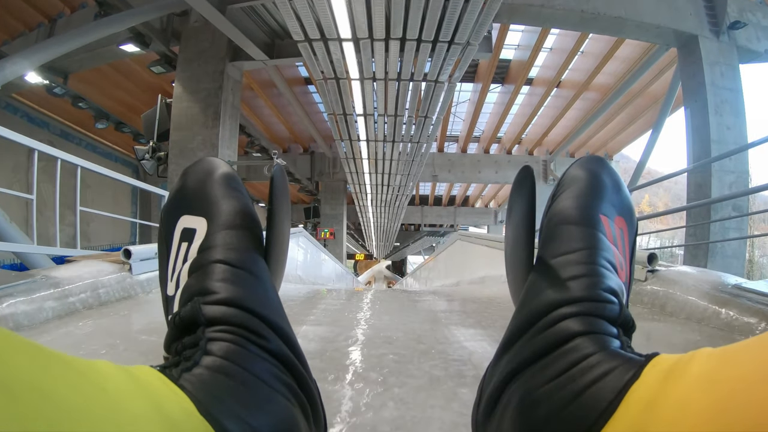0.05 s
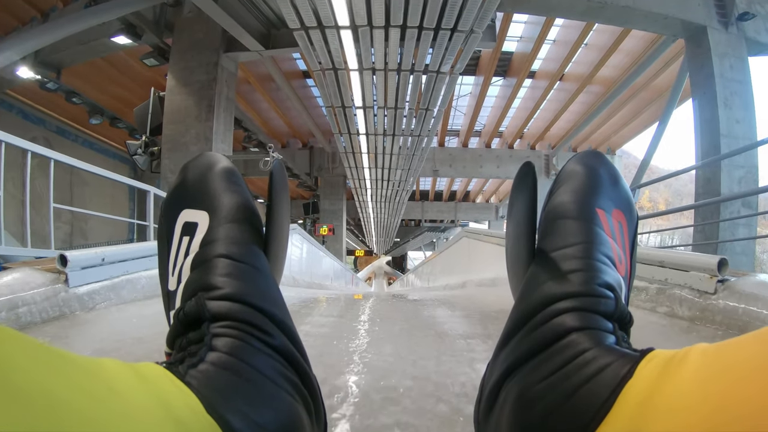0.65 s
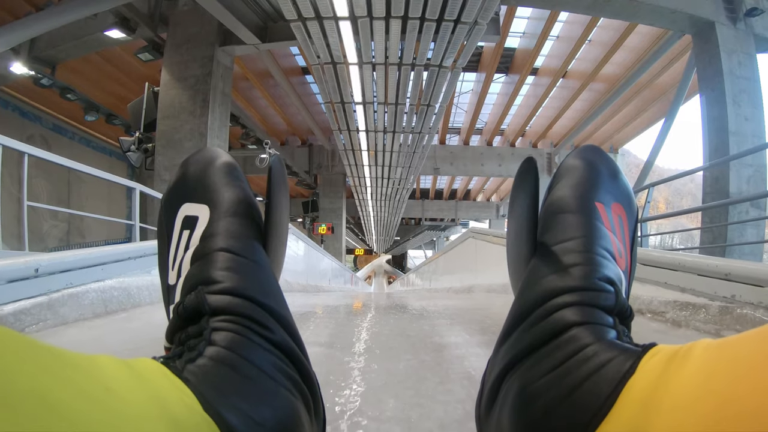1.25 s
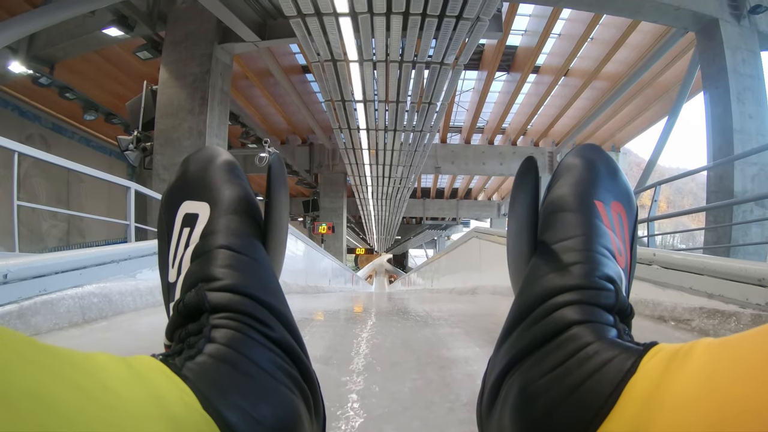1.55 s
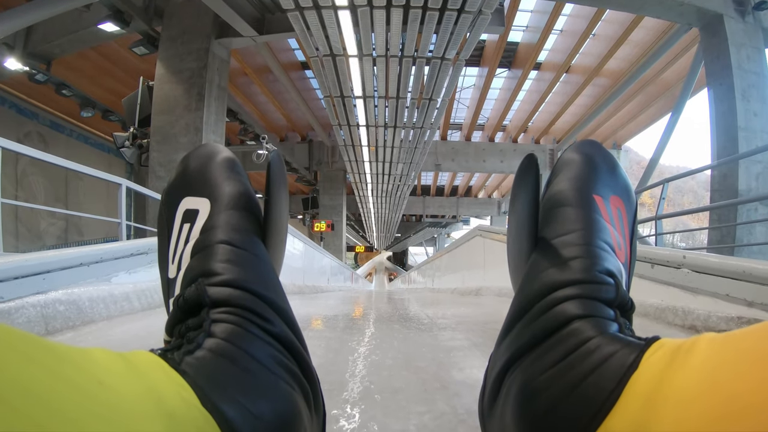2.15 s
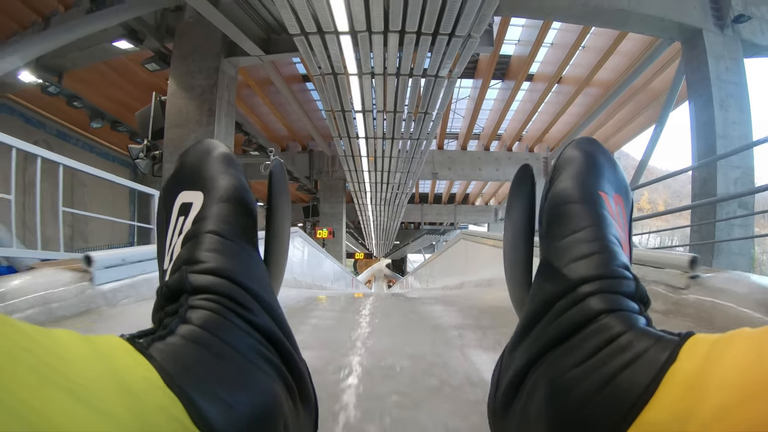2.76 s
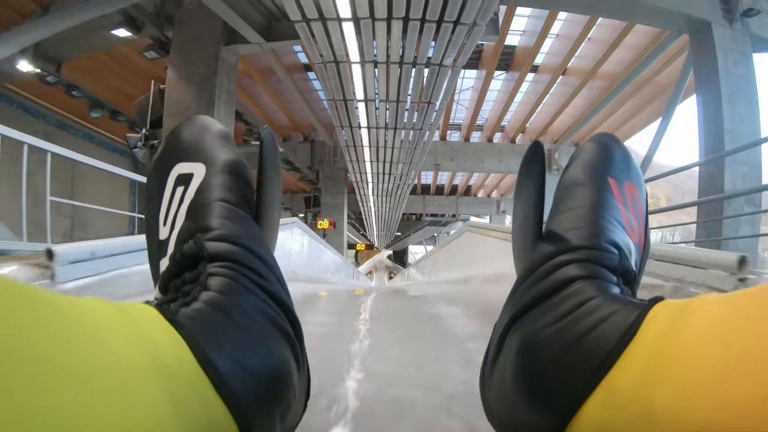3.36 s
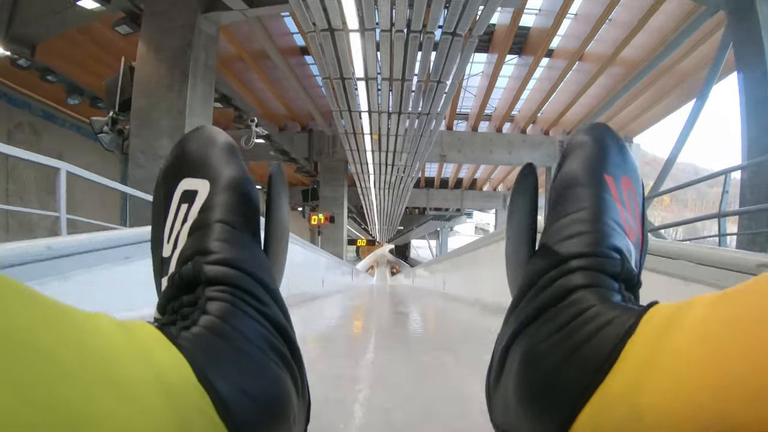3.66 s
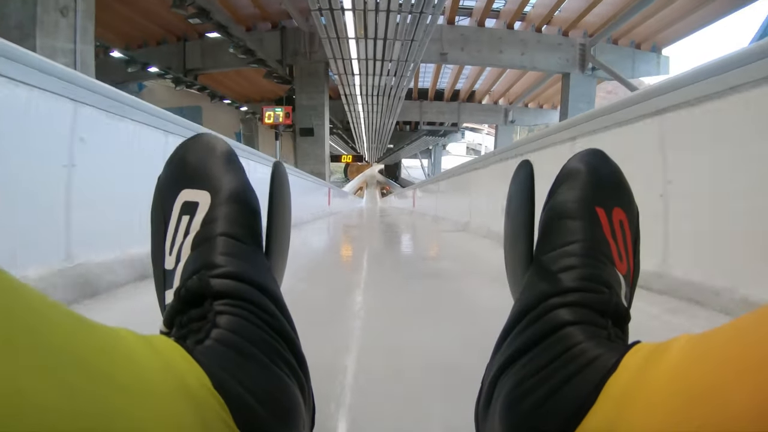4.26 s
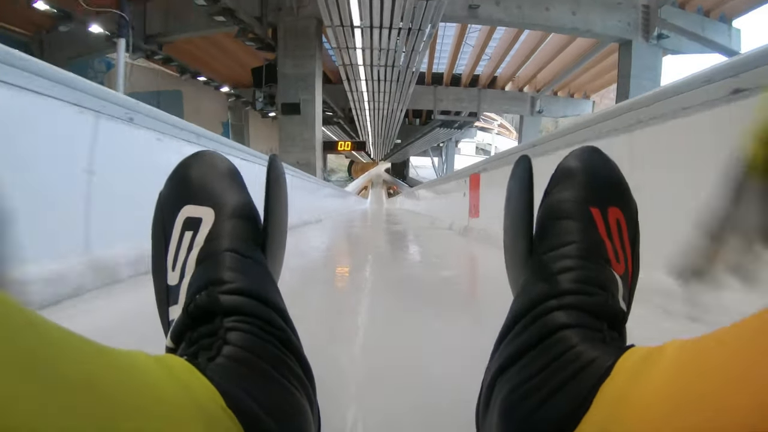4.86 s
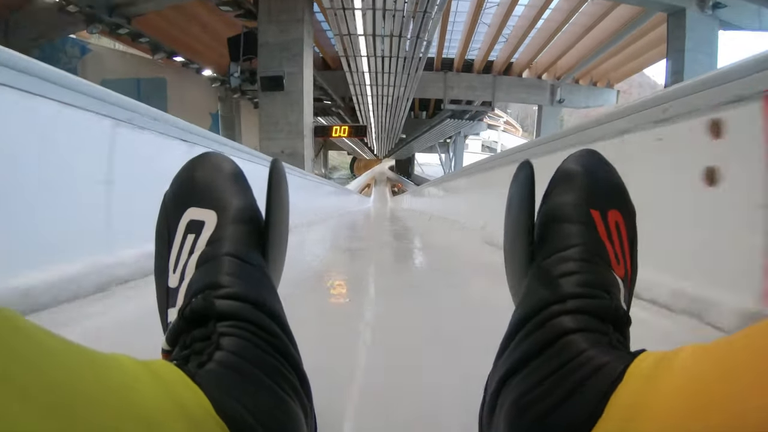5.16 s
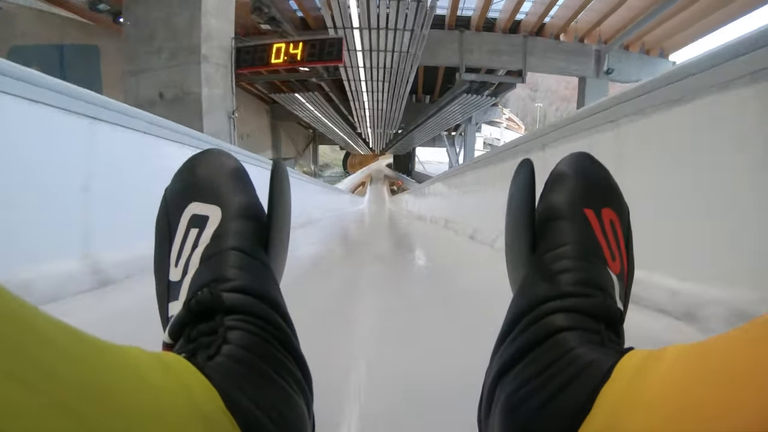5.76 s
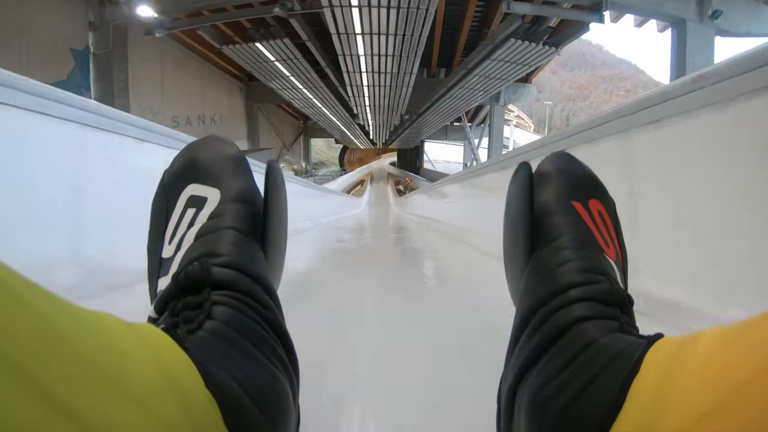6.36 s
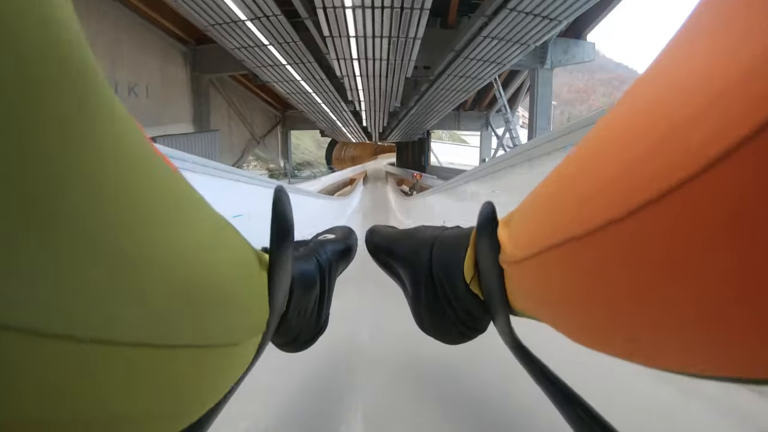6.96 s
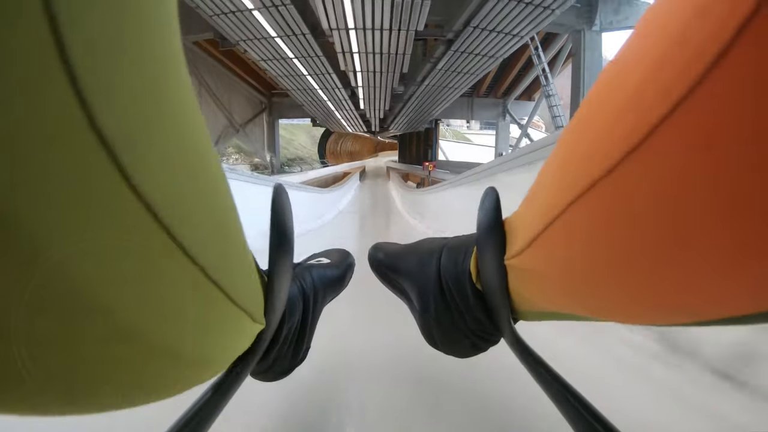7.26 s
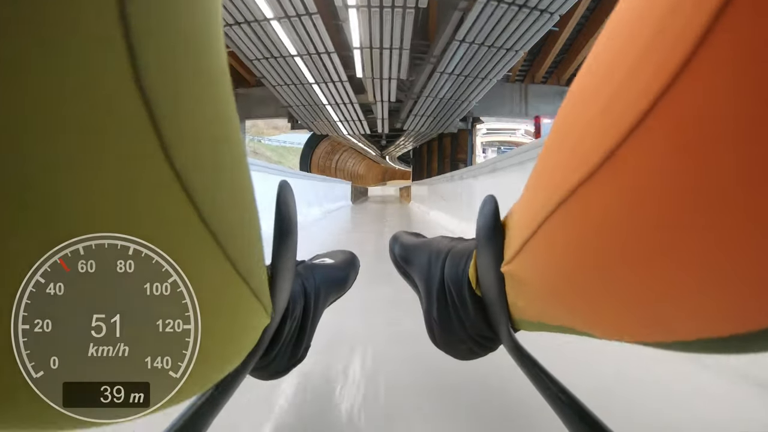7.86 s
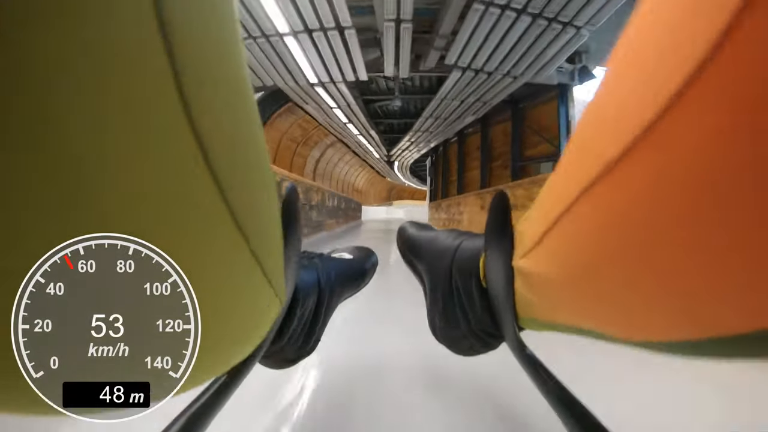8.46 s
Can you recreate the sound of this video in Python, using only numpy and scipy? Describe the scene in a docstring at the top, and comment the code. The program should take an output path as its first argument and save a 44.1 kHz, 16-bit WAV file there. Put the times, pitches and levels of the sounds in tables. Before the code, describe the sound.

A luge is heard from on board on an ice track. At first it rocks to and fro: the steel runners stick and slip with a brief judder, faint uneven scraping and scattered knocks, with two solid woody hits around 2 seconds. At about 2.6 seconds it pulls off with two short chirps and sharper knocks. By 3.6 seconds a loud, steady rumble of sled and air has built up, with steel grinding over rippled ice. Bumps come faster, thumping the seat, ringing the frame and clacking on the ice. From 3 seconds there are faint clinks and tiny puffs of hiss. Between 4 and 5 seconds the edges chirp again, and a runner occasionally sings briefly. Very faint high ticks follow from 6.5 seconds, and the seat booms from about 7.8 until the end at 8.5. Throughout, a very tight doubling makes everything hollow and fluttery.

```python
"""A luge heard from on board. It rocks to and fro: the runners stick and slip, the sled lurches and knocks.
Pulled off at 2.6 s, it gathers speed, steel grinding over rippled ice. Edges catch and chirp; bumps shake
the seat, ring the frame and crack off chips. From 3 s come faint puffs of hiss and clinks on hard spots,
and from 4.3 s a runner sings now and then. Later there are faint, very high ticks, and the seat booms.
Throughout, the sound comes twice, 44 ms apart and equally loud, which makes it hollow and fluttery."""
import sys
import numpy as np
from scipy import signal
from scipy.fft import rfft, irfft, next_fast_len
from scipy.io import wavfile
from scipy.ndimage import uniform_filter1d, minimum_filter1d, map_coordinates

SR = 44100
rng = np.random.default_rng(int(sys.argv[2]) if len(sys.argv) > 2 else 0)


def master_out(mix):
    """Clip the mix to full scale and print it as 16-bit PCM to the path in sys.argv[1]."""
    frames = np.transpose(np.atleast_2d(mix))
    ceiling = np.clip(frames, -1, 1)
    pcm = np.round(ceiling * 32767).astype(np.int16)
    wavfile.write(sys.argv[1], SR, pcm)


N = 375732
TIME = np.arange(N) / SR

# the bed under the lurches and knocks: (time [s], rumble of seat and air [dB], grinding in the frame [dB])
RIDE_LEVELS = [(0, -19.5, -15.5), (.1, -34.5, -26), (.21, -34, -21.5), (.29, -37, -31.5), (.4, -34.5, -35),
               (.76, -63, -42.5), (1.05, -44, -32), (1.2, -53, -34.5), (1.37, -47.5, -41), (1.65, -42, -46),
               (2.0, -33, -28.5), (2.17, -37, -33.5), (2.36, -40.5, -23.5), (2.57, -34, -35),
               (2.79, -32, -24), (3.02, -28.5, -20), (3.17, -28.5, -29), (3.39, -32, -32), (3.6, -20, -21),
               (4.04, -19, -24), (4.4, -22.5, -22.5), (5.55, -18, -25), (5.78, -21, -28), (6.0, -17.5, -23),
               (6.7, -16, -19.5), (7.35, -17.5, -24.5), (7.85, -19, -26.5), (8.52, -15.5, -28.5)]
# how the runners meet the ice, as trims on the grinding:
# (time [s], boom of the seat [dB], bite of the steel [dB], fizz of ice dust [dB])
CONTACT_TRIMS = [(0, -18.5, -9, -25), (.28, -18, -15.5, -31), (.5, -10.5, -18, -34),
                 (1.6, -11.5, -17.5, -32), (2.42, -15.5, -11.5, -34), (2.79, -9, -14, -15.5),
                 (2.94, -19.5, -8.5, -29), (3.4, -8.5, -8, -18.5), (3.7, -10.5, -9, -29),
                 (4.0, -8, -7, -23), (4.075, -19.5, -9.5, -13), (4.16, -13, -8.5, -25.5),
                 (5.6, -8, -11.5, -23), (6.25, -10.5, -10.5, -23), (6.8, -9, -10, -24.5),
                 (7.8, -0.5, -10.5, -26), (8.52, 2, -10, -18)]
# how softly the sled rests on the ice: (time [s], softness [0-1])
CONTACT_SOFTNESS = [(0, 0.65), (.7, 0.76), (1.5, 0.85), (2.7, 0.65), (4.0, 0.53), (8.5, 0.52)]
# the resonances of the seat, the frame and the steel runners: (frequency [Hz], level [dB])
SEAT_SPECTRUM = [(120, -25.5), (260, -6), (310, -1.5), (355, -5.5), (435, 3), (520, -3.5), (610, -1.5),
                 (720, 1.5), (1400, -91)]
FRAME_SPECTRUM = [(350, -25), (590, -21.5), (690, -4), (785, 2.5), (900, -3.5), (1000, 0), (1100, 7.5),
                  (1250, 0), (1420, -2), (1600, -17.5), (3000, -83.5)]
STEEL_SPECTRUM = [(900, -52), (1350, -5), (1470, -5), (1560, 11.5), (1690, 12), (1780, 7), (1900, -2.5),
                  (2080, 0.5), (2220, -1), (2400, -6), (2650, -50), (5000, -62)]


def gain_of(db):
    """Decibels to amplitude."""
    return 10 ** (np.asarray(db) / 20)


def unit_rms(x):
    """Scales each channel to rms 1."""
    return x / np.sqrt(np.mean(x ** 2, axis=-1, keepdims=True) + 1e-20)


def at_hz(table, hz):
    """The columns of a table at the frequencies hz, joined on a log axis."""
    table_hz, *columns = np.transpose(table)
    return [np.interp(np.log(hz + 1), np.log(table_hz + 1), column) for column in columns]


def follow(table):
    """The columns of a timed table at every sample."""
    times, *columns = np.transpose(table)
    return [np.interp(TIME, times, column) for column in columns]


def add(mix, s, sound):
    """Mixes a sound in at s seconds."""
    part = mix[:, max(round(s * SR), 0):][:, :sound.shape[1]]
    part += sound[:, :part.shape[1]]


def ring_of(spectrum, size=8192):
    """The minimum-phase impulse response of a body with this spectrum."""
    db = at_hz(spectrum, abs(np.fft.fftfreq(size, 1 / SR)))[0]
    log_response = np.conj(signal.hilbert(np.log(gain_of(db))))
    return np.fft.ifft(np.exp(log_response)).real[:size // 2]


def retune(ring, octaves):
    """The same ring, shifted in pitch."""
    return map_coordinates(ring, [np.arange(len(ring)) * 2 ** octaves], order=3)


def shake(force, ring):
    """A body driven by a stereo force, at rms 1."""
    return unit_rms(signal.oaconvolve(force, ring[None], axes=1)[:, :force.shape[1]])


def impacts(per_s, spread_db, fade_s):
    """Power, mean 1, of tiny random impacts that start sharply and die away."""
    sizes = gain_of(spread_db * np.minimum(rng.exponential(1, N), np.pi))
    hits = sizes * (rng.random(N) < per_s / SR)
    power = signal.lfilter([1], [1, -np.exp(-1 / (fade_s * SR))], hits ** 2)
    return power / power.mean()


def scrape(spectrum, impact_power, grit):
    """Rough noise with this spectrum; grit is the share that comes in impacts, the rest is smooth."""
    grit = np.clip(grit, 0, 1)
    noise = rng.standard_normal((2, N)) * np.sqrt(1 - grit + grit * impact_power)
    return shake(noise, ring_of(spectrum))


def warble(x, depth_db):
    """Random narrow bands swell and sink briefly, giving the noise a slight warble."""
    spectra = signal.stft(x, nperseg=512)[2]
    patches = uniform_filter1d(rng.standard_normal(spectra.shape[1:]), size=3, axis=0)
    patches = uniform_filter1d(patches, size=8, axis=1)
    spectra *= gain_of(depth_db * patches / patches.std())
    return unit_rms(signal.istft(spectra, nperseg=512)[1][:, :N])


def swell(depth_db, slow_hz, fast_hz):
    """Uneven ice makes the load rise and sink at random, in dB."""
    hz = np.fft.rfftfreq(N, 1 / SR) + 1e-9
    band = 1 / (1 + (slow_hz / hz) ** 4) / (1 + (hz / fast_hz) ** 4)
    return depth_db * unit_rms(irfft(rfft(rng.standard_normal(N)) * band, N))


def runner_load():
    """Rumble and grinding in dB: the ride swells, and each lurch presses the runners down."""
    # the rider rocks, pulls off and paddles: (time [s], length [s], rumble [dB], grinding [dB])
    lurches = [(0.243, 0.025, -26, -31), (0.455, 0.026, -24.5, -27), (0.604, 0.09, -37, -43),
               (0.824, 0.072, -34, -28.5), (1.032, 0.04, -32.5, -25.5), (1.124, 0.079, -33, -30.5),
               (1.283, 0.022, -29, -34), (1.402, 0.045, -26.5, -32), (1.513, 0.075, -33.5, -29.5),
               (1.681, 0.052, -35.5, -30.5), (1.753, 0.065, -30, -28.5), (2.312, 0.084, -29.5, -41),
               (2.63, 0.045, -22.5, -21), (2.823, 0.052, -17.5, -55), (3.05, 0.034, -19.5, -13),
               (3.24, 0.04, -17.5, -14.5), (3.496, 0.08, -16.5, -19.5), (3.91, 0.066, -15.5, -52),
               (4.159, 0.089, -13.5, -17), (4.551, 0.015, -7, -12.5), (4.668, 0.064, -13, -17.5),
               (4.977, 0.017, -12, -39), (5.426, 0.026, -11, -16.5), (5.545, 0.075, -26, -18),
               (6.664, 0.036, -7.5, -14), (7.119, 0.017, -12, -13.5), (7.987, 0.023, -20, -21.5),
               (8.463, 0.051, -27, -46)]
    attack_s, release_s = .014, .0086
    rumble_db, grind_db = follow(RIDE_LEVELS)
    rumble_db += swell(depth_db=2.4, slow_hz=5, fast_hz=14.6)
    grind_db += swell(depth_db=1.8, slow_hz=9.4, fast_hz=14)
    power = gain_of([rumble_db, grind_db]) ** 2
    t = np.arange(SR // 2) / SR
    for s, length_s, *levels_db in lurches:
        press = np.minimum(t / attack_s, 1) * np.exp(-np.maximum(t - length_s, 0) / release_s)
        add(power, s - attack_s / 2, np.outer(gain_of(levels_db), press) ** 2)
    return 10 * np.log10(power)


def runners():
    """Ripples in the ice shake all parts of the sled together; finer grains crackle on top."""
    # the low rumble of seat and air, and the fizz of ice dust: (frequency [Hz], level [dB])
    rumble_spectrum = [(5, -25.5), (14, -3.5), (32, 3), (75, 3.5), (125, 1.5), (200, -5.5), (280, -11.5),
                       (360, -27.5), (700, -91.5)]
    dust_spectrum = [(1500, -4.5), (2450, -1), (2900, 7.5), (3300, -0.5), (3550, -8.5), (3950, -6),
                     (4600, -6), (4900, -9.5), (5250, -8.5), (5700, -8.5), (6900, -12), (7450, -10),
                     (7900, -19.5), (8500, -15.5), (9300, -17), (9800, -18.5), (10600, -52.5), (15500, -65)]
    # the ice along the way: (time [s], rippling [0 smooth - 1 fully rippled])
    ice_texture = [(0, .3), (.26, .45), (.45, .98), (2.5, .92), (2.95, .8), (3.4, .95), (5.9, .96),
                   (6.6, .85), (7.3, .9), (8.5, .93)]
    rumble_db, grind_db = runner_load()
    boom_db, bite_db, fizz_db = follow(CONTACT_TRIMS)
    rippled = follow(ice_texture)[0]
    ripples = impacts(per_s=150, spread_db=2.4, fade_s=.0021)
    grains = impacts(per_s=320, spread_db=4.1, fade_s=.0007)
    rumble = scrape(rumble_spectrum, ripples, grit=.56)
    # the sled's weight keeps the rumble even
    rumble /= np.sqrt(uniform_filter1d(rumble ** 2, size=2600, axis=1) + .18)
    boom = warble(scrape(SEAT_SPECTRUM, ripples, grit=.64 * rippled), depth_db=2.4)
    grind = warble(scrape(FRAME_SPECTRUM, ripples, grit=.97 * rippled), depth_db=2.8)
    bite = warble(scrape(STEEL_SPECTRUM, ripples, grit=rippled), depth_db=2.8)
    fizz = warble(scrape(dust_spectrum, grains, grit=.72 * rippled), depth_db=3.8)
    return (rumble * gain_of(rumble_db - 1.5)
            + boom * gain_of(grind_db + boom_db - .5)
            + grind * gain_of(grind_db + 2.9)
            + bite * gain_of(grind_db + bite_db - 4)
            + fizz * gain_of(grind_db + fizz_db - 3.5))


def glides(cues, rise_s, fall_s, octaves_per_s):
    """Short gliding tones that build up and die away, each cued by its peak's time, pitch and level."""
    t = np.arange(-2200, 3000) / SR
    envelope = np.exp(-(t / np.where(t < 0, rise_s, fall_s)) ** 2)
    out = np.zeros((2, N))
    for s, hz, db in cues:
        cycles = np.cumsum(hz * 2 ** (octaves_per_s * t)) / SR + rng.random((2, 1))
        add(out, s + t[0], gain_of(db) * np.sqrt(2) * envelope * np.sin(2 * np.pi * cycles))
    return out


def judders():
    """The runners stick and slip, each slip higher and weaker; later the sled judders on single modes."""
    # a few cycles of one mode of the sled: (peak time [s], pitch [Hz], level [dB])
    mode_cues = [(1.433, 468, -30), (1.785, 458, -25.5), (2.315, 470, -33.5), (2.35, 785, -28),
                 (2.643, 93, -17), (3.051, 130.7, -12.5), (3.59, 774, -13.5), (3.598, 185.6, -18),
                 (4.218, 120.2, -21), (4.41, 473, -24.5), (4.575, 282, -17), (4.568, 790, -26.5),
                 (3.506, 72, -15), (6.107, 120, -14), (7.141, 97.6, -10.5)]
    slip_every_s, slip_hz, slip_db = .083, 159, -26
    slips = [(.015 + k * slip_every_s, slip_hz + 5.05 * k, slip_db - .8 * k) for k in range(5)]
    return glides(slips + mode_cues, rise_s=.0078, fall_s=.011, octaves_per_s=-4.5)


def crunch(ring, fade_s, rise_s=.00021, size=4096):
    """A burst of noise rings one body, with the energy of 8 ms at rms 1."""
    t = np.arange(size) / SR
    force = rng.standard_normal((2, size)) * (1 - np.exp(-t / rise_s)) ** 2 * np.exp(-t / fade_s)
    ringing = irfft(rfft(force) * rfft(ring, size), size)
    return unit_rms(ringing) * np.sqrt(.008 * SR / size)


def disperse(x, delay_at_1khz_s):
    """Bending waves carry treble faster than bass, so each hit chirps downward."""
    size = next_fast_len(N + SR // 4)
    hz = np.fft.rfftfreq(size, 1 / SR)
    phase = 4 * np.pi * delay_at_1khz_s * np.sqrt(1000 * hz)
    return irfft(rfft(x, size) * np.exp(-1j * phase), size)[:, :N]


def knocks():
    """Each bump thumps the sled, rings seat, frame and steel, and clacks on the ice."""
    # hard bumps in the ice and jolts of the sled:
    # (time [s], strength [dB], thump trim [dB], clack trim [dB])
    hard_bumps = [(0.153, -19, -4, -30), (0.183, -26, -6, -29.5), (0.307, -16.5, -18.5, -26.5),
                  (0.441, -25, -8, -47), (0.53, -35, -14.5, -49), (0.574, -27, -26.5, -44),
                  (0.622, -25, -19.5, -44), (0.668, -23, -19, -43), (0.718, -27, -31, -49),
                  (0.787, -27, -20, -38), (0.804, -31.5, -28, -41), (0.869, -29.5, -1.5, -54),
                  (0.955, -23, -17, -45), (0.992, -29, -15.5, -47), (1.025, -23, -12, -45),
                  (1.065, -26, -15, -37), (1.115, -35.5, -15, -36), (1.149, -30, -13.5, -44),
                  (1.263, -22, -3, -30), (1.289, -17.5, -14, -30.5), (1.416, -20.5, -19.5, -33),
                  (1.523, -23, -18.5, -50), (1.575, -30, -7, -42), (1.705, -19.5, -9, -35),
                  (1.775, -25.5, -5, -32), (1.952, -18, -22.5, -27.5), (2.044, -24, -18, -29),
                  (2.157, -34.5, -14, -37.5), (2.306, -20, -8, -27.5), (2.425, -22, -12.5, -29),
                  (2.475, -26.5, -4.5, -38), (2.693, -16, -23, -60), (2.739, -16.5, -29.5, -16),
                  (2.818, -14, -32.5, -29), (2.839, -27.5, -15, -5), (2.972, -14.5, -25.5, -38),
                  (3.042, -12, -15, -17.5), (3.078, -19.5, -32, -1), (3.253, -15, 0, -31),
                  (3.301, -24, 6.5, -17), (3.353, -29, -9, -41), (3.589, -22, 2, -51),
                  (3.643, -14, -14, -35), (3.827, -17, -22.5, -13), (3.911, -15, -15, -27.5),
                  (3.949, -19, -8.5, -20), (4.092, -12, -6, -17), (4.194, -16.5, -6, -17),
                  (4.445, -13, -39, -22.5), (4.575, -25, 7.5, -16), (4.627, -13.5, -16.5, -19.5),
                  (4.687, -19.5, -18.5, -8), (4.823, -14, 1, -20), (4.933, -13, -21, -25.5),
                  (5.049, -15.5, -7, -18.5), (5.135, -15, 3.5, -14.5), (5.153, -24, 14, -7.5),
                  (5.225, -16.5, -27.5, -48), (5.33, -17.5, -5, -18.5), (5.375, -14, -1, -37),
                  (5.413, -13.5, -10, -19.5), (5.455, -13.5, -1, -33.5), (5.575, -13.5, 3.5, -18),
                  (5.647, -13.5, 7, -21.5), (5.735, -20, 8.5, -43), (5.779, -22.5, 1, -41),
                  (5.832, -16, 8, -19), (5.879, -13.5, -0.5, -23), (5.946, -13.5, 1, -20.5),
                  (6.044, -15.5, 3.5, -13.5), (6.112, -16.5, -11, -18), (6.161, -14, -2, -13.5),
                  (6.279, -16.5, -6, -19.5), (6.351, -23.5, -15, -29.5), (6.394, -10, -21, -17),
                  (6.475, -14, 1.5, -26.5), (6.515, -16.5, 2.5, -20.5), (6.592, -17, 5, -35),
                  (6.715, -20, 6.5, -24), (6.936, -10.5, -6.5, -29), (6.982, -18, -11.5, -34.5),
                  (7.134, -12, -12, -32), (7.175, -13.5, -11, -28), (7.216, -13, -18.5, -24),
                  (7.259, -15, -14.5, -31), (7.303, -14, -11.5, -24.5), (7.38, -12.5, -2, -24.5),
                  (7.448, -13, 4, -19.5), (7.52, -18.5, -7, -23), (7.635, -16.5, -2.5, -31.5),
                  (7.737, -14.5, -2.5, -21.5), (7.778, -22, -7, -26), (7.8, -31, -5, -14),
                  (7.965, -18, 3, -28.5), (7.99, -15.5, 9.5, -18.5), (8.068, -15.5, -14.5, -16.5),
                  (8.166, -13, 5, -21.5), (8.2, -18.5, 4, -33), (8.238, -14.5, -6.5, -18.5),
                  (8.284, -26.5, 1.5, -15), (8.328, -14.5, 5, -23.5), (8.367, -18, 8.5, -14),
                  (8.407, -11.5, 2, -18), (8.457, -15, 8.5, -18)]
    # the sled's dull thump and the clack of steel on hard ice: (frequency [Hz], level [dB])
    thump_spectrum = [(5, -14), (22, 0), (60, -20.5), (110, -2.5), (200, -2.5), (330, -16.5), (450, -19),
                      (620, -22), (1200, -86.5)]
    clack_spectrum = [(1500, -4), (2450, 4.5), (2900, 9), (3500, -6), (4000, -2), (4600, -15), (4900, -5.5),
                      (5250, -9.5), (5800, -10.5), (7400, -12), (8200, -19), (9400, -13), (10600, -52.5),
                      (15500, -57)]
    thump, clack = ring_of(thump_spectrum), ring_of(clack_spectrum)
    seat, frame, steel = map(ring_of, (SEAT_SPECTRUM, FRAME_SPECTRUM, STEEL_SPECTRUM))
    # a soft contact makes the steel ring quieter and lower
    softness = follow(CONTACT_SOFTNESS)[0]
    steel_db = follow(CONTACT_TRIMS)[1] - 7 * softness
    sag_octaves = .3 * (softness - softness[-1])
    cues = hard_bumps + small_bumps()
    # every knock lands at another spot, so seat, frame and steel ring a little higher or lower
    detune_octaves = [.1, .05, .05] * rng.standard_normal((len(cues), 3))
    out = np.zeros((2, N))
    for (s, db, thump_db, clack_db), octaves in zip(cues, detune_octaves):
        i = round(s * SR)
        seat_ring = retune(seat, octaves[0])
        frame_ring = retune(frame, octaves[1])
        steel_ring = retune(steel, octaves[2] - sag_octaves[i])
        add(out, s, crunch(thump, fade_s=.0015) * gain_of(db + thump_db - 3.5))
        add(out, s, crunch(seat_ring, fade_s=.0022) * gain_of(db + thump_db / 2 - 6.5))
        add(out, s, crunch(frame_ring, fade_s=.0033) * gain_of(db + 2.7))
        add(out, s, crunch(steel_ring, fade_s=.0049) * gain_of(db + steel_db[i] + 6.2))
        add(out, s, crunch(clack, fade_s=.0041, rise_s=.00047) * gain_of(db + clack_db - 1.5))
    return disperse(out, delay_at_1khz_s=.001635)


def strikes(size=4096):
    """A clean blow and a small rebound ring the whole sled: woody on soft contact, sharp on hard."""
    # solid hits: (time [s], level [dB], centre of emphasis [Hz])
    hits = [(.3495, -22.5, 753), (1.8916, -14.5, 580), (2.069, -27, 450), (2.2122, -13.5, 564),
            (2.8372, -13, 1555), (3.3491, -12, 1430), (3.426, -16, 1080), (4.553, -11, 544),
            (4.933, -17.5, 1440), (8.09, -11, 1630), (8.123, -21.5, 425), (8.4571, -13.5, 497)]
    # the whole sled under a clean blow: (frequency [Hz], level [dB])
    shell_spectrum = [(20, -20), (120, -4), (280, 7), (430, 5), (540, 1.5), (760, 11.5), (1100, 9.5),
                      (1450, 2.5), (1750, -3), (2250, -8), (2700, -28.5), (6000, -53), (12000, -85)]
    rebound_s, rebound_db = .0065, -6.5
    crunch_db, crunch_fade_s = -22.5, .0076
    focus_db = 6.5  # cut one octave from the centre
    t = np.arange(size) / SR
    shell_hz, shell_db = np.transpose(shell_spectrum)
    out = np.zeros((2, N))
    for s, db, centre_hz in hits:
        force = gain_of(crunch_db) * rng.standard_normal((2, size)) * np.exp(-t / crunch_fade_s)
        force[0, 0] += 1  # blow and rebound drive only the channel that both sides share
        force[0, round(rebound_s * SR)] += gain_of(rebound_db)
        colour_db = np.maximum(shell_db - focus_db * np.log2(shell_hz / centre_hz) ** 2, -90)
        hit = signal.oaconvolve(force, ring_of(np.c_[shell_hz, colour_db])[None], axes=1)
        add(out, s, gain_of(db) * hit / np.linalg.norm(hit[0]) * np.sqrt(.008 * SR))
    return disperse(out, delay_at_1khz_s=.00171)


def chirps(hz=1034):
    """A runner's edge catches and chirps upward."""
    # edge catches: (peak time [s], level [dB])
    catches = [(2.696, -12.5), (2.822, -10), (4.297, -13), (4.632, -18), (4.811, -13.5)]
    return glides([(s, hz, db) for s, db in catches], rise_s=.003, fall_s=.01, octaves_per_s=7.23)


def small_bumps(count=150, every_m=.42, spread_db=1.5):
    """Cues for lesser knocks, scattered along the track, so they come faster with speed."""
    # the sled gathers speed: (time [s], speed [km/h])
    speed = [(2.55, -1.5), (3.5, 18.5), (5.5, 35), (7.5, 48), (8.52, 52.5)]
    metres = np.cumsum(follow(speed)[0].clip(0)) / 3.6 / SR
    grind_db = follow(RIDE_LEVELS)[1]
    scatter = rng.standard_normal((count, 4))
    bump_metres = every_m * (np.arange(count) + 1 + np.tanh(scatter[:, 0]) / 2)
    onsets = np.searchsorted(metres, bump_metres)
    trims_db = [0, -7, -22] + spread_db * scatter[:, 1:]
    return [(i / SR, grind_db[i] + db, thump_db, clack_db)
            for i, (db, thump_db, clack_db) in zip(onsets, trims_db) if i < N]


def bell_fades(cues):
    """A gain curve that fades in and out around each cue."""
    return sum(gain_of(db) * np.exp(-((TIME - s) / half_s) ** 2) for s, half_s, db in cues)


def puffs_and_ticks():
    """Short puffs of airy hiss and faint, very high ticks."""
    # puffs, the shortest heard as ticks: (peak time [s], half length [s], level [dB])
    puffs = [(3.07, .025, -70), (4.09, .03, -76), (5.14, 0.013, -72), (6.2, .06, -79), (6.52, .005, -68),
             (6.715, .007, -68), (6.96, .04, -70), (8.038, .004, -66)]
    # the airy hiss: (frequency [Hz], level [dB])
    hiss_spectrum = [(4000, -39), (9000, -1), (11000, 4), (13000, 5), (15500, -4)]
    crackle = impacts(per_s=400, spread_db=3, fade_s=.0006)
    return bell_fades(puffs) * scrape(hiss_spectrum, crackle, grit=.8)


def clinks():
    """A runner strikes a hard spot and the steel rings briefly in one high band."""
    # hard spots in the ice: (time [s], top of the band's peak [Hz], level [dB])
    hard_spots = [(3.08, 4800, -30.5), (3.552, 7600, -49), (3.951, 4030, -33.5), (4.049, 7600, -48),
                  (4.89, 7500, -49), (4.933, 5250, -41.5), (6.278, 4850, -39), (7.218, 5000, -30.5),
                  (7.45, 4460, -39.5), (7.522, 5000, -41.5)]
    # (frequency [ratio], level [dB])
    band = [(1 / 3, -25), (.6, -6), (.79, 0), (1, 0), (1.2, -10), (1.7, -38), (2.5, -70)]
    out = np.zeros((2, N))
    for s, hz, db in hard_spots:
        ring = ring_of([(hz * ratio, band_db) for ratio, band_db in band])
        add(out, s, crunch(ring, fade_s=.0017) * gain_of(db))
    return out


def singing(hz=1780):
    """Steady friction keeps one narrow mode of a runner going for a moment."""
    # sung notes of the steel: (peak time [s], half length [s], level [dB])
    notes = [(4.315, 0.023, -35.5), (4.487, 0.026, -27.5), (5.416, 0.013, -31), (7.386, 0.03, -31)]
    # (frequency [ratio], level [dB])
    mode = [(.8, -50), (.95, -14), (1, 0), (1.05, -14), (1.25, -50), (3, -95)]
    ring = ring_of([(hz * ratio, db) for ratio, db in mode])
    return bell_fades(notes) * shake(rng.standard_normal((2, N)), ring)


def soften(x):
    """Soft contact stirs the frame's upper modes less, and least while the sled only rocks."""
    upper_band = signal.butter(2, [980, 1600], "bandpass", fs=SR, output="sos")
    softness = follow(CONTACT_SOFTNESS)[0]
    return x - softness * signal.sosfiltfilt(upper_band, x)


def stereo_image(pair):
    """Bass reaches both sides alike; near 1 kHz the frame rocks and they move against each other."""
    # how the two sides relate:
    # (frequency [Hz], likeness [0-1], left's phase lead [rad], left minus right [dB])
    sides = [(40, .96, 0, -.5), (150, .99, 0, -1), (330, .9, .1, -3), (450, .78, .3, -5), (520, .48, 0, -7),
             (610, .55, -1.5, -2), (780, .94, -3.6, -5), (1080, .98, -3.7, 0), (1280, .88, -3.9, 0),
             (1540, .55, -2.6, 3), (1730, .9, -1, 1), (2050, .3, 0, 5), (2300, .75, -2.4, -1),
             (3100, .8, -3, 1), (3650, .3, -1.8, 3), (4100, .6, -2.4, 6), (4300, .3, -1, 5),
             (4600, .75, .5, 4), (5300, .5, 0, 3), (5900, .5, -3.6, 1), (6500, .5, -2.3, 0),
             (7400, .3, -.8, -11), (8300, .4, -2.6, 0), (9200, .2, -1, 10), (11000, .1, 0, 0)]
    size = next_fast_len(N + SR // 4)
    likeness, lead, balance_db = at_hz(sides, np.fft.rfftfreq(size, 1 / SR))
    shared, right_only = rfft(pair, size)
    right = (likeness * shared + np.sqrt(1 - likeness ** 2) * right_only) * np.exp(-1j * lead)
    balance = gain_of(balance_db)
    equal_power = np.sqrt(2 / (1 + balance ** 2))
    return irfft(np.array([shared * balance, right]) * equal_power, size)[:, :N]


def scene():
    """The sliding bed, the hits and the runners' tones, as heard on the sled."""
    tones = judders() + chirps()
    ride = soften(runners() + knocks())
    return stereo_image(ride + tones + strikes() + clinks() + singing() + puffs_and_ticks())


def record(dry):
    """An equally loud double follows the sound; a quick limiter rounds the peaks; the very top is cut."""
    double_s, limiter_samples, cutoff_hz = .04399, 61, 15800
    doubled = dry.copy()
    add(doubled, double_s, dry)
    needed_gain = 1 / np.maximum(abs(doubled), 1)
    held_gain = minimum_filter1d(needed_gain, limiter_samples, axis=1)
    limited = doubled * uniform_filter1d(held_gain, limiter_samples, axis=1)
    low_pass = signal.firwin(511, cutoff_hz, window=("kaiser", 9), fs=SR)
    return signal.oaconvolve(limited, low_pass[None], "same")


dry = scene()
out = record(dry)
master_out(out)
```